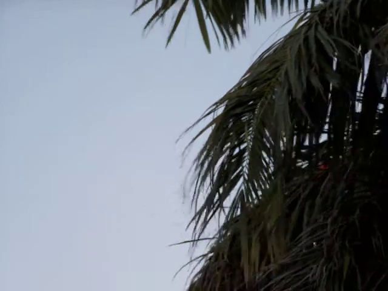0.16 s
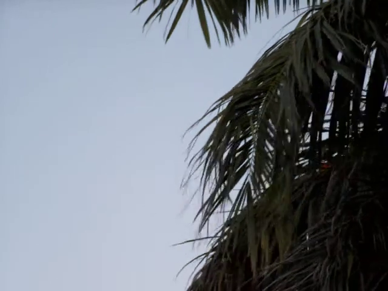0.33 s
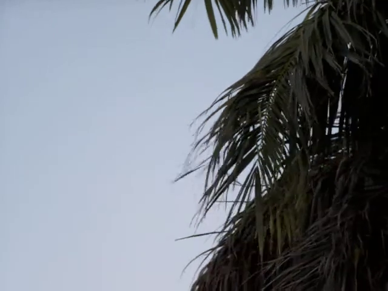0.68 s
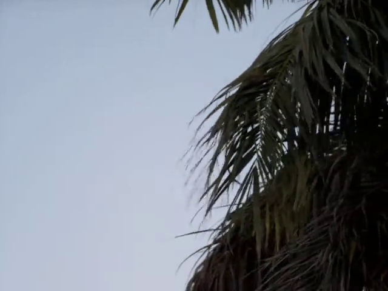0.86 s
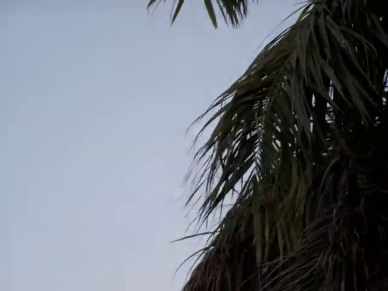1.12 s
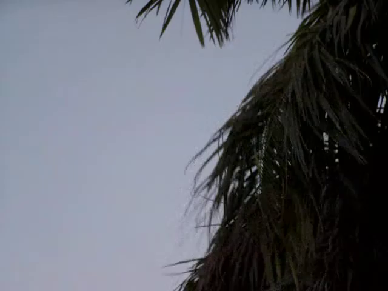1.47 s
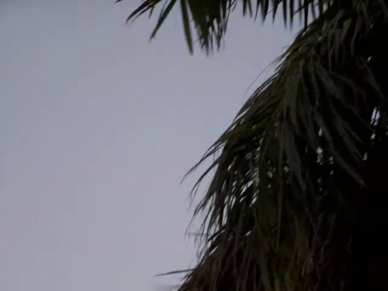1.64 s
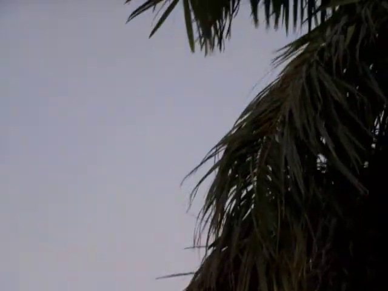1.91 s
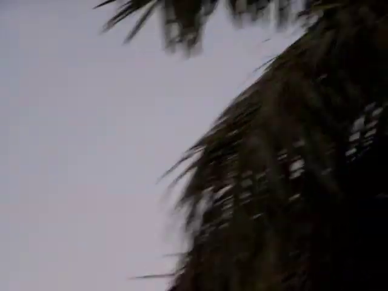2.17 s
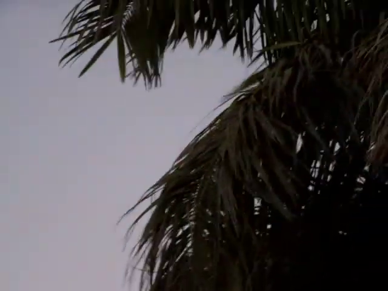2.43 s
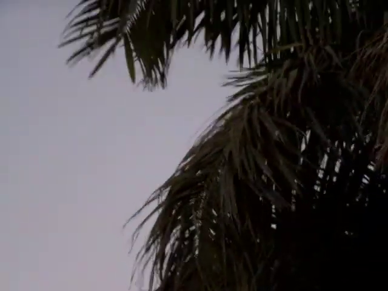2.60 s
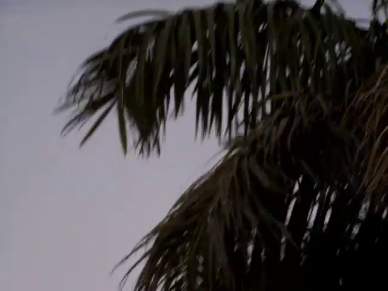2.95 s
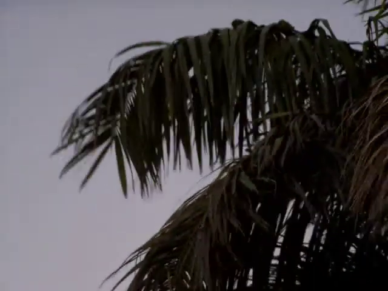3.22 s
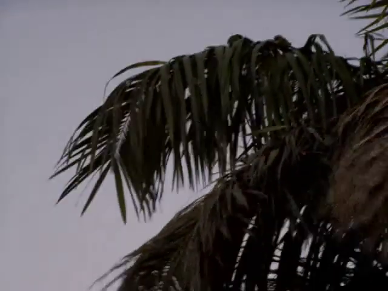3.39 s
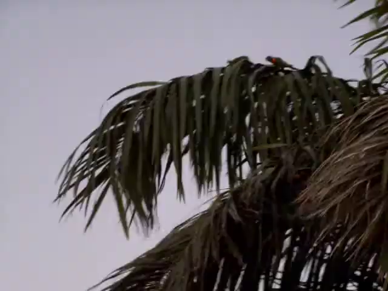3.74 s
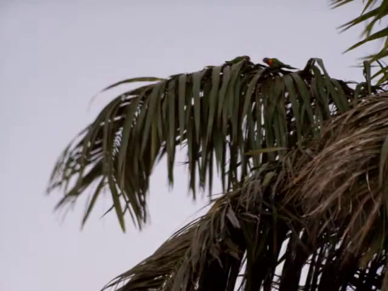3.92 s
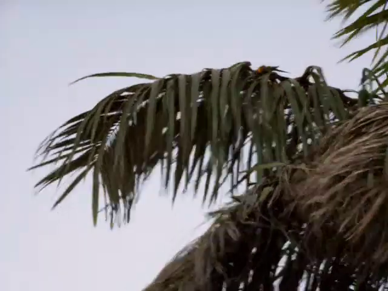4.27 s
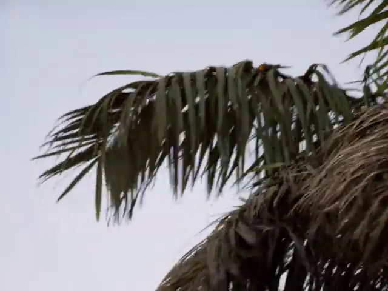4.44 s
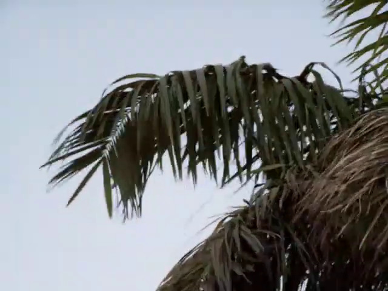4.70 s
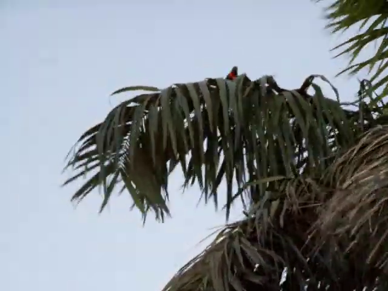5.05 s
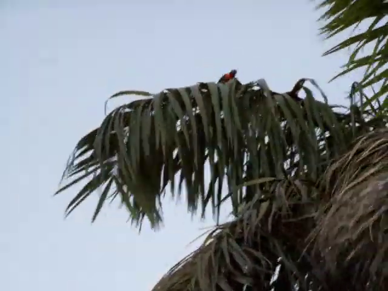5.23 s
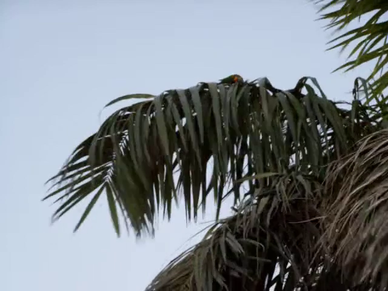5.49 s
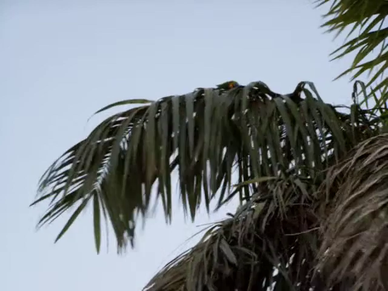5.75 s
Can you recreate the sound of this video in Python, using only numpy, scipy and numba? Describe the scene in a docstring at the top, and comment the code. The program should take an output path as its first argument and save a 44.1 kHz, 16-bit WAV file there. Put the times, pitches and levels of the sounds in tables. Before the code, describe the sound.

Shrill chatter from hundreds of roosting parrots fills the open air, with sharp whistles and chirps standing out from the closest palm. Underneath are a soft rustle of fronds and town, occasional faint wingbeats and a few hoarse, faraway bird calls. A low motor hum gives way to a distant engine that slowly sinks in pitch and swells toward the end. Rough squawks come in the second half, along with one quick, high warble.

```python
"""A flock of lorikeets screeches in the palms at dusk, hundreds of voices scattered by the crowns
over a rustle of fronds and town. The nearest birds whistle short arching notes and chirp. A motor
hums, wings whirr past now and then, and a bigger bird calls far off. A distant engine takes over
from the motor, slowly dropping in pitch. From 2.3 s come a brief faint drone and harsh near squawks;
near the end one bird warbles and the engine grows louder."""
import sys
import numpy as np
from scipy import signal
from scipy.fft import rfft, irfft, next_fast_len
from scipy.io import wavfile
from scipy.ndimage import uniform_filter1d
from numba import njit

SR = 44100
rng = np.random.default_rng(int(sys.argv[2]) if len(sys.argv) > 2 else 0)


def store_wav(level_fs):
    """Save 16-bit WAV to argv[1]."""
    pcm = np.round(np.clip(np.atleast_2d(level_fs), -1, 1) * 32767)
    wavfile.write(sys.argv[1], SR, pcm.T.astype(np.int16))


N = 258867
T = np.arange(N) / SR


def undb(db):
    """Decibels to gain."""
    return 10 ** (np.asarray(db) / 20)


def unit(x):
    """Scale to rms 1."""
    return x / np.sqrt(np.mean(x ** 2) + 1e-18)


def curves(table):
    """Interpolate each column linearly over the first, time_s."""
    time_s, *columns = np.transpose(table)
    return [np.interp(T, time_s, column) for column in columns]


def add(out, start_s, x):
    """Mix x into out at start_s."""
    i = int(np.clip(start_s * SR, 0, N))
    out[i:i + len(x)] += x[:N - i]


def colour(x, points):
    """Filter by (freq_hz, gain_db) points."""
    freq_hz, gain_db = np.transpose(points)
    size = next_fast_len(N)
    bin_hz = np.maximum(np.arange(size // 2 + 1) * SR / size, 1)
    gain = undb(np.interp(np.log(bin_hz), np.log(freq_hz), gain_db))
    return irfft(rfft(x, size) * gain, size)[:N]


def noise(points):
    """Noise of rms 1, shaped by (freq_hz, gain_db) points."""
    return unit(colour(rng.standard_normal(N), points))


def whiten(x):
    """Flatten the long-term spectrum, keep the fine detail."""
    size = next_fast_len(N)
    bins = rfft(x, size)
    power = uniform_filter1d(abs(bins) ** 2, size=1500)
    return irfft(bins / np.sqrt(abs(power) + power.mean() * 1e-5), size)[:N]


def wander(t, rate_hz):
    """Straight lines between bounded random values of spread 1."""
    knots = np.sqrt(3) * rng.uniform(-1, 1, size=512)
    return np.interp(t * rate_hz % len(knots), np.arange(len(knots)), knots)


def note(length_s, pitches_hz, rough, edge_s=0.0033, flutter_db=2.0, throb_db=5, overtone_db=-23):
    """Syrinx note: a near sine on a curved glide; strain makes it trill, rasp, curl and throb."""
    t = np.arange(int(length_s * SR)) / SR
    u = t / t[-1]
    start_hz, middle_hz, end_hz = pitches_hz
    glide_hz = start_hz * (1 - u) * (1 - 2 * u) + middle_hz * 4 * u * (1 - u) + end_hz * u * (2 * u - 1)
    trill_hz = rng.uniform(70, 300.4)
    trill = np.sin(2 * np.pi * (trill_hz * t + rng.random()))
    rasp = 0.0882 * wander(t, rate_hz=900)
    curl = 0.0606 * wander(t, rate_hz=90.24)
    pitch_hz = glide_hz * (1 + rough * (rasp + 0.071 * trill + curl))
    pressure = np.clip(np.minimum(t, t[-1] - t) / edge_s, 0, 1)
    sag = 1 - 0.14 * (1 - pressure) ** 2  # low air pressure flattens both ends
    phase = 2 * np.pi * np.cumsum(pitch_hz * sag) / SR
    envelope = pressure * undb(flutter_db * wander(t, rate_hz=170) + min(rough, 1) * throb_db * trill)
    return unit(envelope * (np.sin(phase) + undb(overtone_db) * np.sin(2 * phase)))


def sing(table, glide, rough):
    """Play a table of notes; glide is the (start, end) pitch as a ratio to mid-note."""
    out = np.zeros(N)
    for start_s, length_s, pitch_hz, level_db in table:
        pitches_hz = (pitch_hz * glide[0], pitch_hz, pitch_hz * glide[1])
        add(out, start_s, undb(level_db) * note(length_s, pitches_hz, rough))
    return out


def trees(x, wet_db, t60_s):
    """Trunks and walls return sparse, decaying echoes."""
    t = np.arange(SR) / SR
    taps = rng.standard_normal(SR) * (rng.random(SR) < .03) * (t > .006)
    echoes = taps * np.exp(-np.log(1000) * t / t60_s)
    return x + undb(wet_db) * signal.fftconvolve(x, echoes / np.linalg.norm(echoes))[:N]


def crowd(low_hz, high_hz, bend, rough, spread_db, count):
    """Birds take turns, each note with its own distance, pitch, arch and strain; most notes fall."""
    out = np.zeros(N)
    golden = (np.sqrt(5) - 1) / 2  # step that keeps successive pitches apart
    for k, (delay, span, detune, strain, nearness, slope, arch) in enumerate(rng.random((count, 7))):
        pitch_hz = low_hz * (high_hz / low_hz) ** ((k * golden + detune / 2) % 1)
        tilt = bend * (2 * slope - 1.2) * arch
        pitches_hz = pitch_hz * np.array([1 - tilt, 1 + bend * (arch - .3), 1 + tilt])
        start_s = (k + delay) / count * N / SR
        length_s = 0.0199 + 0.054 * span ** 2
        add(out, start_s, undb(spread_db * nearness) * note(length_s, pitches_hz, rough * strain))
    return unit(out)


# Flock spectrum: freq_hz, gain_db
FLOCK_SPECTRUM = [(500, -35), (1100, -18), (1900, -16), (2200, -11.5), (2450, -3), (2750, 0), (4000, -1.5),
                  (5100, -7), (5900, -9.5), (6500, -14.5), (7400, -17), (8500, -32)]
# Flock treble swells: time_s, relative_db
FLOCK_TREBLE = [(0.32, -31.3), (0.48, -33.5), (0.62, -26.5), (0.92, -29.5), (1.12, -27.5), (1.45, -30.5),
                (1.68, -25.5), (1.9, -31.5), (2.3, -30.5), (2.75, -28), (3.35, -25), (3.72, -31),
                (3.9, -33.5), (4.18, -26.5), (4.68, -32), (5.36, -30.3), (5.53, -37.2), (5.66, -31.5)]


def flock(chatter_db=-20.5, treble_gain_db=1.6):
    """Calls from the next trees over the din of the roost; the furthest birds merge into hiss."""
    chirps = crowd(3000, 4900, bend=.21, rough=.33, spread_db=3.0, count=360)
    squeals = crowd(4600, 6500, bend=0.065, rough=.4, spread_db=4.5, count=130)
    squawks = crowd(3200, 5400, bend=.1, rough=1.384, spread_db=3.5, count=380)
    din = crowd(2700, 7200, bend=.15, rough=1.0, spread_db=4.0, count=900)
    hiss = noise([(1500, -3), (2300, 3.5), (2700, 2.5), (3200, -1), (4000, -3), (9000, -2)])
    nearer = trees(chirps + undb(-7) * squeals + undb(-2) * squawks, wet_db=-10, t60_s=.45)
    roost = undb(-2) * trees(din, wet_db=-3, t60_s=.4) + undb(-7) * hiss
    voices = colour(whiten(nearer + roost), FLOCK_SPECTRUM)
    chatter = colour(voices, [(4200, 0), (4700, -30)])
    treble_db = treble_gain_db + curves(FLOCK_TREBLE)[0]
    return unit(chatter) * undb(chatter_db) + unit(voices - chatter) * undb(treble_db)


# Rustle spectrum: freq_hz, gain_db
RUSTLE_SPECTRUM = [(20, -16.5), (55, 4), (130, -5.5), (260, 0.5), (400, -1), (600, 1), (1000, 5),
                   (1400, 3.5), (2100, -1.5), (3500, -21.5)]
# Rustle envelope: time_s, level_db
RUSTLE_LEVEL = [(.06, -40), (.3, -37), (.7, -34.5), (1.1, -38), (2, -37), (2.75, -35), (3.15, -39.5),
                (4.1, -42), (4.7, -35), (5.2, -45), (5.87, -38.5)]


def rustle(flicker_db=2.05):
    """Soft, flickering noise of fronds and town."""
    return noise(RUSTLE_SPECTRUM) * undb(curves(RUSTLE_LEVEL)[0] + flicker_db * wander(T, rate_hz=30))


# Arching whistles: start_s, length_s, pitch_hz, level_db
ARCHING_WHISTLES = [(.178, 0.048, 5900, -29), (.265, 0.03, 4860, -23), (.285, 0.035, 6010, -26.5),
                    (.83, 0.024, 5770, -17), (.908, 0.04, 5850, -18.5), (.955, 0.035, 4770, -23),
                    (.978, 0.023, 5850, -20), (1.703, 0.037, 5550, -23.5), (1.777, 0.046, 5590, -17),
                    (1.822, .035, 4720, -17), (1.85, 0.025, 5710, -17), (1.973, 0.033, 6000, -21),
                    (3.57, 0.011, 4950, -22), (3.612, 0.032, 4930, -21), (3.712, .05, 4590, -24.5),
                    (3.895, 0.032, 4000, -25), (5.03, 0.031, 4960, -23.5), (5.056, 0.022, 5570, -20),
                    (5.138, 0.034, 6600, -24.5), (5.425, 0.023, 5180, -21.5), (5.447, 0.03, 4760, -16.5),
                    (5.563, 0.041, 5540, -22.5)]
# Falling notes that level out: start_s, length_s, pitch_hz, level_db
FALLING_NOTES = [(.325, .04, 3435, -18), (.418, 0.024, 3280, -20.5), (.858, 0.056, 4470, -22.5),
                 (1.485, 0.039, 3320, -22.5), (1.872, 0.035, 4590, -17.5), (2.042, 0.058, 3905, -20),
                 (2.208, 0.11, 3540, -20), (2.628, 0.075, 3700, -22.5), (3.285, 0.035, 2800, -28),
                 (4.055, .09, 6300, -32), (4.36, .07, 6510, -31.5), (4.375, .055, 3253, -19),
                 (4.495, 0.018, 4060, -20.5), (5.085, 0.044, 3850, -17.5), (5.485, 0.084, 4000, -17.5),
                 (5.8, 0.061, 3090, -20.5)]
# Steeply dropping chips: start_s, length_s, pitch_hz, level_db
STEEP_CHIPS = [(.383, 0.023, 3160, -20.5), (1.218, .028, 3580, -25), (1.265, 0.022, 3770, -25.5),
               (1.385, 0.048, 3300, -21), (3.35, .035, 3810, -24), (3.845, 0.036, 3000, -22.5),
               (4.67, 0.022, 2690, -20.5), (5.61, 0.016, 3180, -20), (5.77, .02, 4290, -24)]
# Rising chirps: start_s, length_s, pitch_hz, level_db
RISING_CHIRPS = [(.462, .034, 3450, -23), (.484, .035, 3020, -20), (.712, .022, 3010, -21.5),
                 (1.32, .052, 3025, -31), (2.148, .06, 6300, -29), (2.56, .046, 3400, -18.5),
                 (2.93, .075, 5630, -22), (3.04, .04, 2890, -26), (3.79, .048, 3220, -19),
                 (4.092, .045, 3020, -25), (5.121, .016, 5280, -16)]


def near_calls():
    """Birds in the nearest palm whistle and chirp with little strain."""
    return (sing(ARCHING_WHISTLES, glide=(.94, .94), rough=.12)
            + sing(FALLING_NOTES, glide=(1.05, 1), rough=.1)
            + sing(STEEP_CHIPS, glide=(1.14, .81), rough=.18)
            + sing(RISING_CHIRPS, glide=(.94, 1.06), rough=.14))


def hum(pitch_hz, level_db, waver_db=2.0):
    """One machine partial, wavering on its way from afar."""
    phase = 2 * np.pi * np.cumsum(pitch_hz) / SR
    return np.sqrt(2) * np.sin(phase) * undb(level_db + waver_db * wander(T, rate_hz=9.9))


# Motor partials: time_s, pitch_hz, hum_relative_db, fifth_relative_db
MOTOR_PARTIALS = [(.2, 103, -64, -56.5), (.55, 103, -51, -44.5), (.65, 103.5, -44.5, -42.5),
                  (1, 104, -44.5, -50), (1.35, 104, -43, -56.5), (1.8, 105, -47, -56), (2.8, 108, -60, -63)]


def motor():
    """A motor hums on two partials a fifth apart."""
    pitch_hz, hum_db, fifth_db = curves(MOTOR_PARTIALS)
    return hum(pitch_hz, hum_db) + hum(1.5 * pitch_hz, fifth_db)


# Wingbeat bursts: start_s, length_s, level_db
WING_BURSTS = [(0.514, 0.44, -43), (2.416, 0.27, -41), (4.633, 0.17, -34), (4.936, 0.093, -32.5)]


def wings(beat_hz=19):
    """Small wings whirr past: noise pulsed at the beat rate."""
    envelope = np.zeros(N)
    for start_s, length_s, level_db in WING_BURSTS:
        t = np.arange(int(length_s * SR)) / SR
        beats = 1 - 0.42 * np.cos(2 * np.pi * beat_hz * t)
        add(envelope, start_s, undb(level_db) * np.hanning(len(t)) ** .5 * beats)
    return envelope * noise([(40, 1), (240, 5.0), (400, -7), (900, 6.5), (4000, -14)])


# Far bird's calls: start_s, length_s, pitch_hz, level_db
FAR_CALLS = [(.53, .078, 1330, -37.5), (.59, 0.091, 1230, -39.5), (1.66, .08, 1250, -40),
             (2.62, .38, 1140, -41), (3.09, .2, 1500, -43)]


def far_bird():
    """A bigger bird calls through the trees, low and hoarse."""
    return trees(sing(FAR_CALLS, glide=(.94, 1.02), rough=.35), wet_db=-10, t60_s=.28)


# Engine exhaust: time_s, firing_hz, first_harmonic_relative_db, second_harmonic_relative_db
ENGINE_EXHAUST = [(0, 91.7, -82, -81), (2, 88.9, -50, -67), (3.4, 84.9, -58, -57.5),
                  (4.1, 84.5, -48, -54.5), (4.4, 85.6, -46, -45.5), (4.68, 84, -36.5, -40.5),
                  (5.05, 83.1, -42.5, -38), (5.3, 81.2, -40.5, -35.5), (5.5, 82.8, -39, -35.5),
                  (5.8, 83, -33, -33.5)]


def engine():
    """A distant engine; only the four lowest exhaust harmonics carry this far."""
    firing_hz, first_db, second_db = curves(ENGINE_EXHAUST)
    out = hum(firing_hz, first_db)
    for harmonic, offset_db in [(2, 0), (3, -17), (4, -28)]:
        out += hum(harmonic * firing_hz, second_db + offset_db)
    return out


# Low drone: start_s, length_s, pitch_hz, level_db
DRONE_SWELLS = [(2.3, .7, 240, -50.5)]


def drone():
    """A faint, unsteady tone swells and fades far away."""
    out = np.zeros(N)
    for start_s, length_s, pitch_hz, level_db in DRONE_SWELLS:
        t = np.arange(int(length_s * SR)) / SR
        phase = 2 * np.pi * np.cumsum(pitch_hz * (1 + 0.088 * wander(t, rate_hz=60))) / SR
        add(out, start_s, undb(level_db) * np.sin(np.pi * t / length_s) * unit(np.sin(phase)))
    return out


# Harsh squawks: start_s, length_s, pitch_hz, level_db
HARSH_SQUAWKS = [(2.303, .034, 4170, -20.5), (2.355, 0.019, 6540, -28.5), (2.435, 0.034, 2614, -22.5),
                 (2.96, 0.045, 5680, -26.5), (3.275, 0.024, 3930, -18), (4.005, .046, 2700, -20),
                 (4.215, .03, 5880, -28), (4.725, 0.018, 4330, -19), (5.005, 0.044, 4080, -20),
                 (5.365, .055, 4900, -22)]


def near_squawks():
    """Near birds strain the syrinx into rough, falling notes."""
    return sing(HARSH_SQUAWKS, glide=(1.08, .94), rough=.51)


# Warbled run: start_s, length_s, pitch_hz, level_db
WARBLE_RUNS = [(4.742, .175, 6080, -18)]


def warble(count=5, droop=.05):
    """Arching notes back to back, highest in mid-run."""
    run = []
    for start_s, length_s, pitch_hz, level_db in WARBLE_RUNS:
        note_s = length_s / count
        for k, u in enumerate(np.linspace(-1, 1, count)):
            run.append((start_s + k * note_s, note_s, pitch_hz * (1 - droop * u ** 2), level_db))
    return sing(run, glide=(.96, .94), rough=.12)


def scene(traffic_gain_db=0.5):
    """Mono mix: near birds in front of the roost and the background."""
    near = trees(near_calls() + near_squawks() + warble(), wet_db=-10.5, t60_s=.8)
    birds = near + flock() + far_bird()
    background = rustle() + wings() + undb(traffic_gain_db) * (engine() + motor()) + drone()
    return (birds + background)[None]


@njit
def follow(power, attack_s, release_s):
    """Level detector with separate rise and fall times."""
    out, level = np.empty(len(power)), power[0]
    for i in range(len(power)):
        level += (power[i] - level) / (SR * (attack_s if power[i] > level else release_s))
        out[i] = level
    return out


def record(dry, knee_db=-23, ratio=2.54, makeup_db=3, start_s=.055, fade_s=.22):
    """The sound cuts in and fades up; gain control ducks the mix under loud calls; the top is cut."""
    rolloff_hz, cutoff_hz = 7600, 8900
    power = follow(uniform_filter1d(dry[0] ** 2, size=220), attack_s=.0072, release_s=.045)
    over_db = np.maximum(10 * np.log10(abs(power) + 1e-18) - knee_db, 0)
    fade_db = -13.5 * np.clip(1 - (T - start_s) / fade_s, 0, 1)
    held = dry * undb(makeup_db - over_db * (1 - 1 / ratio) + fade_db) * (T > start_s)
    dull = signal.sosfilt(signal.butter(6, rolloff_hz, fs=SR, output="sos"), held)
    return signal.sosfilt(signal.ellip(10, .2, 80, cutoff_hz, fs=SR, output="sos"), dull)


dry = scene()
out = record(dry)
store_wav(out)
```